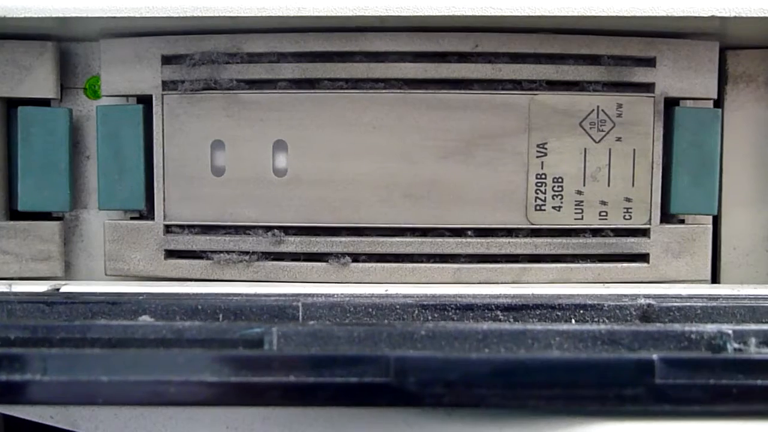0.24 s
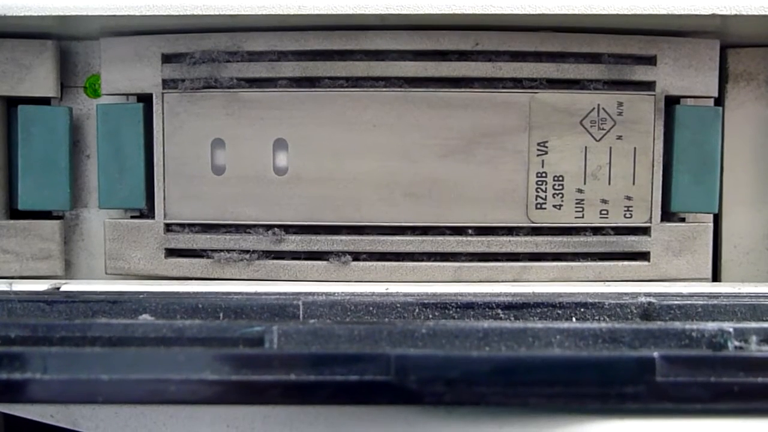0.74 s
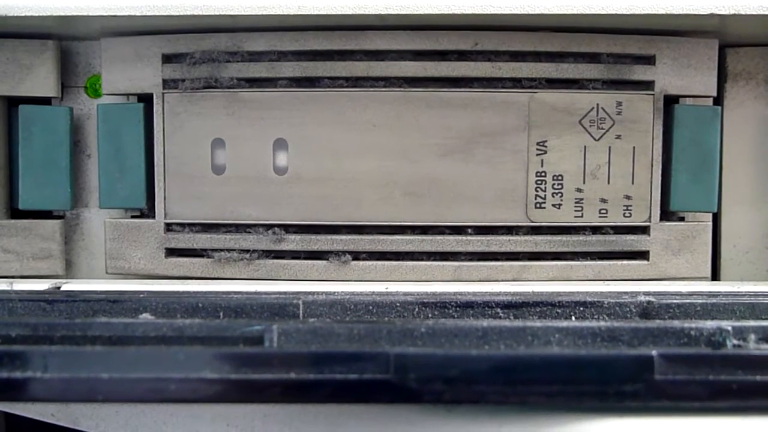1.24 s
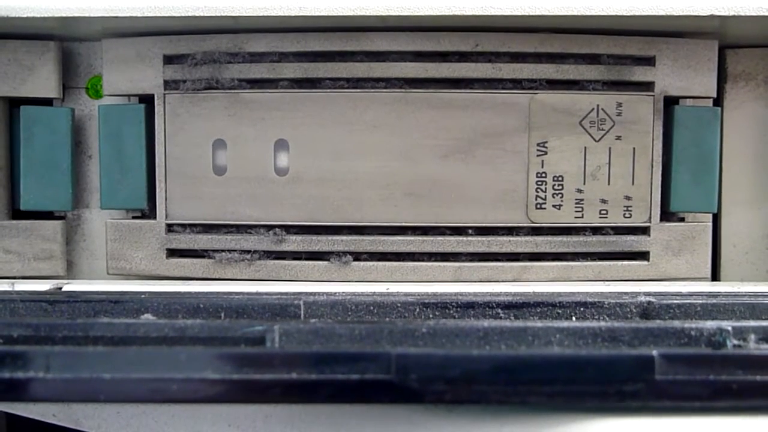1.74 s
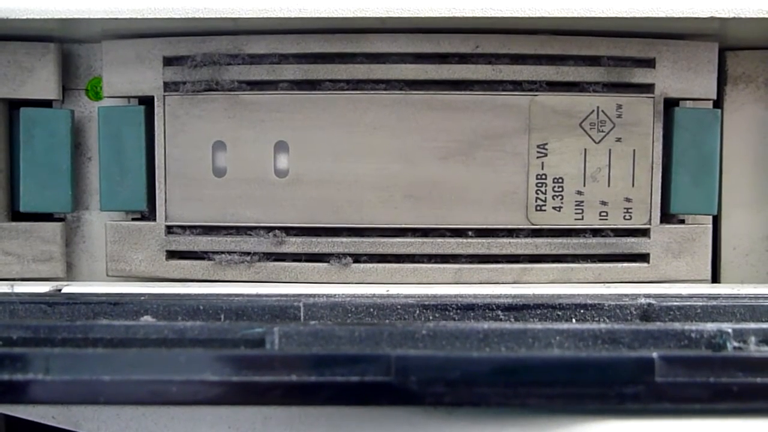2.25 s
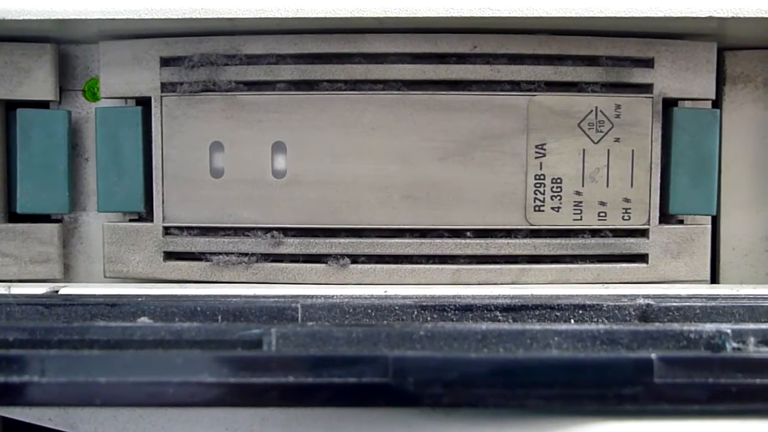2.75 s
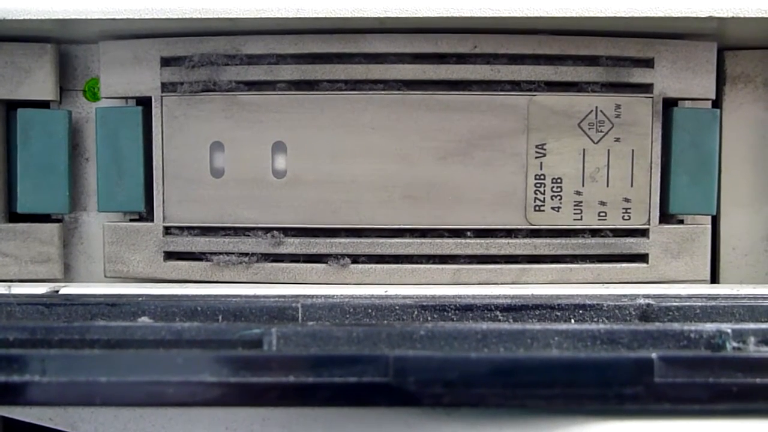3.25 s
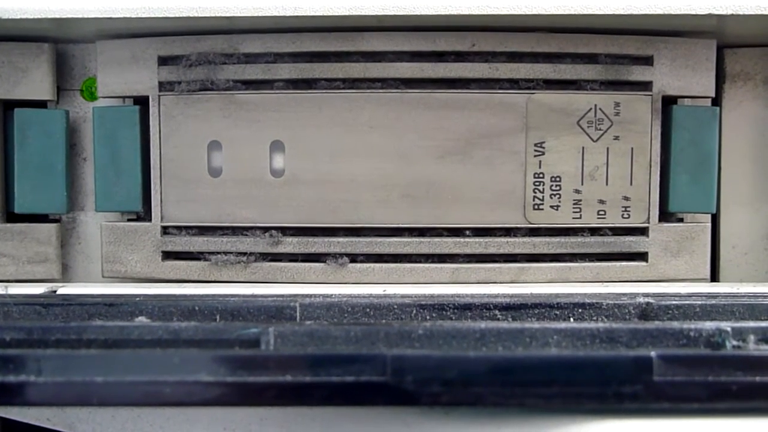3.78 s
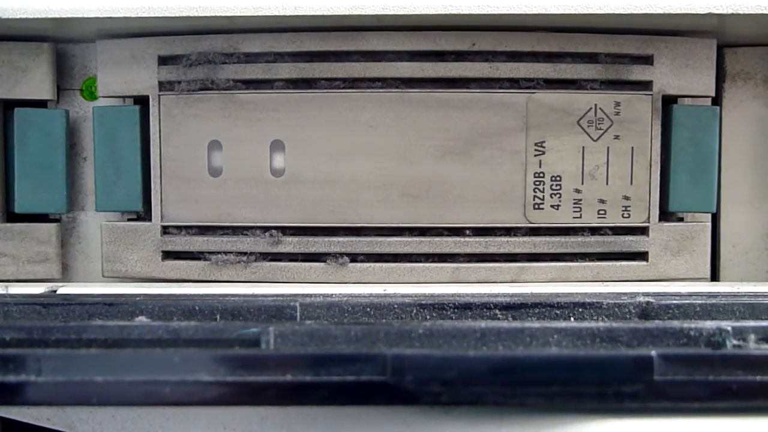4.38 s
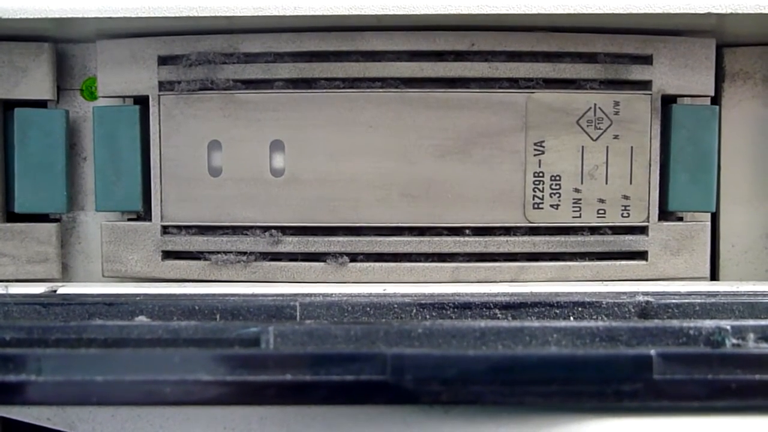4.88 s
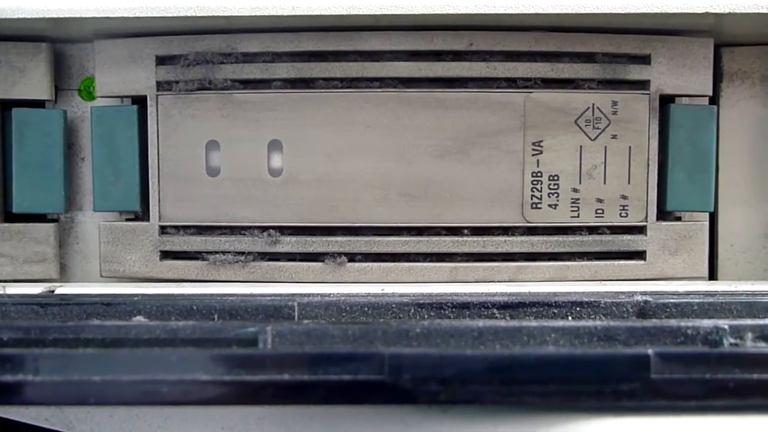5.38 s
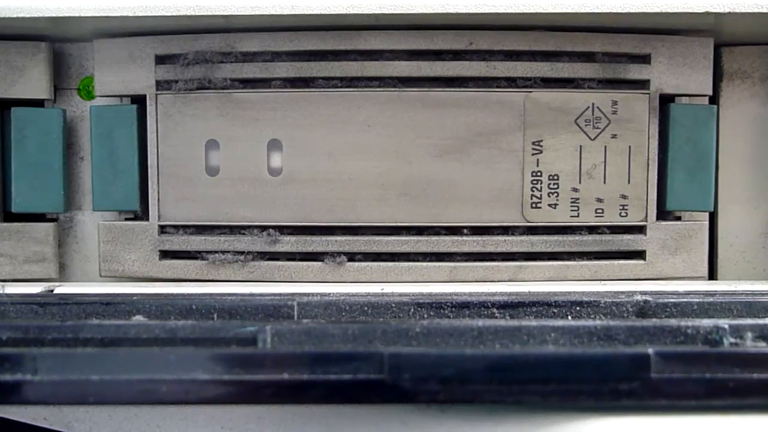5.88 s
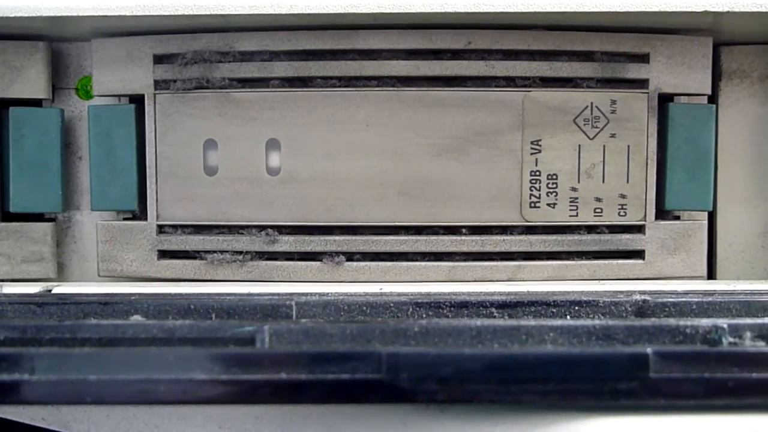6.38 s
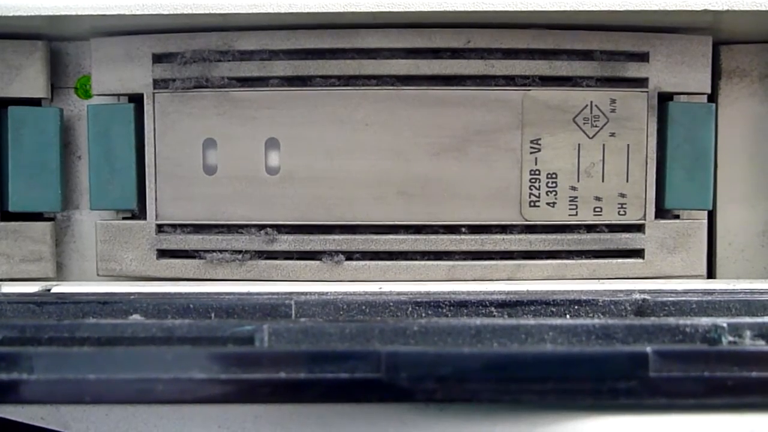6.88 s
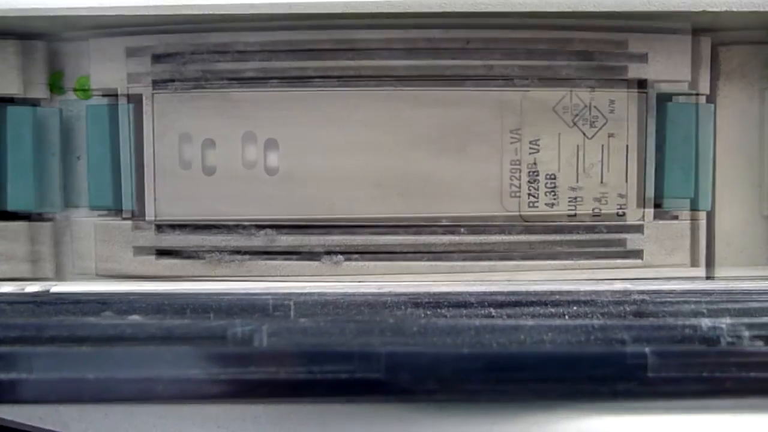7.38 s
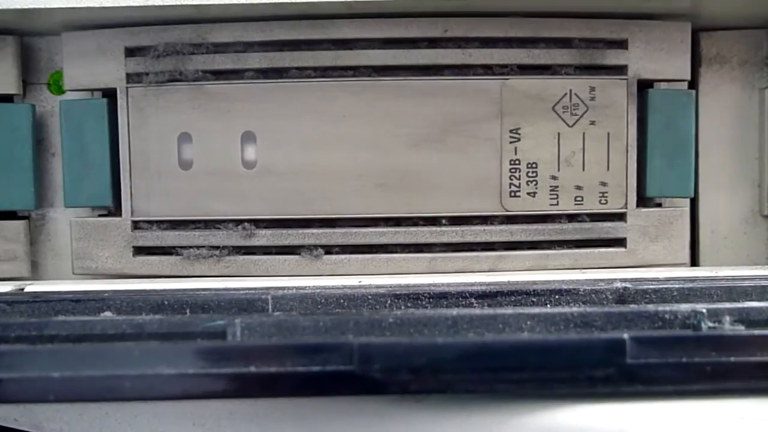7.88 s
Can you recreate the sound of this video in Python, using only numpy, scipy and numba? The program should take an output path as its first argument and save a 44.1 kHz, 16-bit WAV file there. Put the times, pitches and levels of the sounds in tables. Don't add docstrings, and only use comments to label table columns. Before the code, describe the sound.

An old hard drive's worn bearing whines upward in pitch, a latch clicks sharply midway, then the harsh whine holds steady over a faint hum.

```python
import sys
import numpy as np
from scipy import signal
from scipy.fft import rfft, irfft, next_fast_len
from scipy.io import wavfile
from scipy.ndimage import uniform_filter1d
from numba import njit

SR = 44100
rng = np.random.default_rng(int(sys.argv[2]) if len(sys.argv) > 2 else 0)


def store_wav(level_fs):
    pcm = np.round(np.clip(np.atleast_2d(level_fs), -1, 1) * 32767)
    wavfile.write(sys.argv[1], SR, pcm.T.astype(np.int16))


def how_loud(loudness_db):
    steps = np.asarray(loudness_db, float) / 20
    return 10 ** steps


N = 358533
T = np.arange(N) / SR
CAGE = 0.62875
TURN = 4096

# time in seconds, spindle turns per second.
SPINDLE_SPEED = [(0.0, 88.04), (0.4, 92.31), (0.8, 96.35), (1.2, 100.24), (1.6, 103.75), (2.0, 106.97),
                 (2.4, 109.81), (2.8, 112.19), (3.2, 114.32), (3.6, 116.17), (4.0, 117.84), (4.4, 119.24),
                 (4.8, 120.25), (5.0, 120.54), (5.2, 120.41), (5.4, 119.97), (5.8, 120.01), (8.13, 120.01)]


def spindle_turns():
    return np.cumsum(np.interp(T, *np.transpose(SPINDLE_SPEED))) / SR


# multiple of the dent rate, level in dB.
WEAR_BELOW = [(1, -53), (2, -58), (3, -45), (4, -42), (16, -42), (18, -46), (36, -46)]
WEAR_ON = [(1, -48), (2, -58), (3, -37), (9, -53), (12, -40.5), (16, -38.5), (25, -52), (27, -76)]
WEAR_ABOVE = [(1, -73), (2, -47), (3, -48), (4, -44), (11, -42), (16, -44), (18, -48), (36, -44.5)]
# one value per ball, in dB per octave above the fourth multiple.
EDGE_DB_PER_OCTAVE = (1.2, 0, -.8)
# level in dB below, on and above.
FINE_ROUGHNESS_DB = (-55, -62, -53)
# multiple of the dent rate, ball from 1 to 3, cage rates off, level in dB.
MARKS = [(14, 1, 1, -44), (3, 3, -1, -40), (4, 1, -1, -38), (5, 2, -1, -36), (6, 1, -1, -38),
         (6, 2, -1, -37), (6, 3, -1, -45), (14, 1, -1, -42), (4, 3, -1, -46), (8, 2, -1, -37),
         (10, 1, 1, -47), (11, 3, -1, -35), (12, 1, -1, -34), (13, 1, -1, -36), (16, 1, -1, -35),
         (3, 2, 0, -35), (3, 3, 0, -30), (4, 1, 0, -34), (28, 1, 1, -44), (10, 2, 0, -42), (6, 1, 0, -41),
         (6, 2, 0, -43), (19, 1, 0, -48), (19, 2, 0, -39), (3, 3, 1, -43), (6, 1, 1, -36), (6, 2, 1, -33),
         (6, 3, 1, -45), (11, 3, 1, -35), (13, 2, 1, -34)]
# half multiple of
# the dent rate, level in dB below, on and above.
HALF_MULTIPLES = [(1.5, -70, -53, -49), (2.5, -70, -40, -52), (3.5, -58, -44, -55), (4.5, -42, -50, -46),
                  (5.5, -45, -54, -48), (6.5, -48, -56, -51), (7.5, -49, -70, -51), (8.5, -48, -70, -49),
                  (9.5, -49, -70, -49), (10.5, -49, -48, -60), (11.5, -47, -47, -51), (12.5, -49, -48, -49),
                  (13.5, -49, -52, -50), (14.5, -48, -53, -50)]


def ball_surface(ball, side, wear_spread_db=1.5):
    db = np.full(TURN, -200.0)
    scatter = rng.standard_normal(TURN)
    multiple = np.arange(1, 37)
    on_multiple, between = 2 * multiple, 2 * multiple + 1

    edges_db = EDGE_DB_PER_OCTAVE[ball] * np.log2(np.maximum(multiple / 4, 1))
    wear_db = slope((WEAR_BELOW, WEAR_ON, WEAR_ABOVE)[side])(multiple) + edges_db
    db[on_multiple] = wear_db + wear_spread_db * scatter[on_multiple]
    db[between] = FINE_ROUGHNESS_DB[side] + 2.5 * scatter[between]

    for mark_multiple, worn_ball, cage_off, mark_db in MARKS:
        if (worn_ball - 1, cage_off + 1) == (ball, side):
            db[2 * mark_multiple] = mark_db
    for half_multiple, *half_db in HALF_MULTIPLES:
        step = int(2 * half_multiple)
        db[step] = half_db[side] - 5 + 2.5 * scatter[step]

    phases = np.exp(2j * np.pi * rng.random(TURN))
    return np.fft.ifft(np.sqrt(2) * how_loud(db) * phases) * TURN


DENT_PASSES = (3.5375, 3.5407, 3.5438)
# centre in Hz, width in Hz, boost or cut in dB.
BACKWARD_WHIRL = [(1225, 84, -15), (1377, 45, -10), (1471, 35, -10), (1728, 35, -13), (1836, 44, 8),
                  (1982, 48, -8), (2171, 96, -11), (2300, 35, 10), (2404, 35, 12), (2481, 210, -12),
                  (2588, 103, 6), (3311, 35, -9), (4435, 400, -14), (4598, 282, 15), (4868, 216, -9),
                  (5883, 242, 3), (7137, 58, -15), (11257, 95, 4), (2474, 30, 6)]
AXIAL = [(909, 153, -15), (1048, 35, 9), (1883, 81, -5), (2036, 51, -15), (2095, 244, 13), (2312, 35, 7),
         (2510, 118, -11), (2721, 42, -15), (3069, 149, -15), (3916, 250, -12), (4473, 49, 12),
         (4823, 336, -15), (5527, 35, 6), (5952, 287, -15), (6693, 109, 7), (7025, 55, 7), (7446, 168, 9),
         (8173, 327, 7), (372, 40, 9), (425, 40, -5)]
FORWARD_WHIRL = [(1328, 35, 13), (1532, 35, -15), (1619, 40, -15), (1659, 100, 11), (2001, 91, 15),
                 (2096, 400, -14), (2472, 62, 9), (2598, 41, 15), (2609, 35, -14), (2937, 193, 5),
                 (3322, 103, 7), (3676, 50, 5), (4584, 373, -12), (4770, 65, 15), (4956, 174, 10),
                 (5577, 148, -6), (5950, 400, 7), (11983, 136, 7)]
# frequency in Hz, lift in dB.
TREBLE_LIFT = [(200, 0), (6000, 0), (8000, 2), (12000, 2.5), (16000, 2)]


def balls(turns, load_db=1.8):
    places = []
    for passes in DENT_PASSES:
        skid = 0.0055 * walk(2.5)
        places.append((passes * turns / 2 + skid) % 1 * TURN)

    out = 0
    for side, modes in enumerate((BACKWARD_WHIRL, AXIAL, FORWARD_WHIRL)):
        force = 0
        for ball, place in enumerate(places):
            table = ball_surface(ball, side)
            whole = place.astype(int)
            rise_to_next = np.roll(table, -1) - table
            contact = table[whole] + (place - whole) * rise_to_next[whole]
            force = force + how_loud(load_db * walk(3.045)) * contact
        cage_shift = np.exp(2j * np.pi * (side - 1) * CAGE * turns)
        force = (force * cage_shift).real
        out = out + colour(force, lambda f: bells(f, modes) + slope(TREBLE_LIFT)(f))
    return out


# frequency in Hz, level in dB.
HISS_COLOUR = [(150, -26), (250, -1.5), (500, -1), (1000, -3.5), (1800, -4), (2500, -4), (3500, -3),
               (5000, -3), (7000, -5.5), (10000, -3.5), (13000, -5.5), (16000, 4.5)]


def hiss(turns, hiss_db=-12, beat=0.11, flicker_db=0.5):
    swell = 1 + beat * np.cos(4 * np.pi * CAGE * turns)
    noise = how_loud(hiss_db + flicker_db * walk(12)) * swell * rng.standard_normal(N)
    return colour(noise, slope(HISS_COLOUR))


# frequency in Hz, level in dB.
CASE_TILT = [(150, -27.4), (250, -12.2), (400, -14.8), (800, -12.8), (1400, -8.7), (2400, 0.0),
             (3200, -10.2), (5000, -18.8), (8000, -14.7), (12000, -23.7), (15600, -19.4)]
# centre in Hz, width in Hz, boost or cut in dB.
CASE_MODES = [(275, 70, 7), (630, 140, 7.4), (1049, 57, 8), (1143, 85, 3.7), (1593, 164, 7.1),
              (1806, 69, 6.1), (2489, 455, 13.3), (2672, 284, -7.6), (2887, 77, -14.4), (2997, 88, 4.2),
              (3697, 201, 5.1), (4471, 35, 5.6), (4608, 68, 11.5), (4854, 363, 13.4), (5380, 184, 5.6),
              (5937, 277, 7.7), (6230, 119, 6.6), (7835, 140, -13.7), (8234, 405, 22.4), (8301, 384, -22.8),
              (9566, 650, 23.4), (9683, 684, -25.0), (10955, 126, 4.3), (11302, 290, 13.5),
              (12109, 490, 15.1), (12887, 263, -6.0), (14356, 731, -21), (14568, 402, 17.3),
              (14948, 537, -8.7), (15826, 672, -25.0)]


def case(forces):
    return colour(forces, lambda f: slope(CASE_TILT)(f) + bells(f, CASE_MODES))


# start in seconds, level in dB.
CLICKS = [
    (4.5943, -7.5),
    (4.5953, -11),
    (4.5964, -6.5),
    (4.598, -14),
    (7.6236, -28),
]
# pitch in Hz, level in dB, seconds to fade by 60 dB.
LATCH_RING = [(3650, 0, .025), (5200, -3, .015), (6300, -5, .01), (8037, -7, .01), (9300, -6, .01),
              (11020, -4, .02)]


def latch(push_s=0.0012):
    blow, rattle = np.zeros(N), np.zeros(N)
    for start, db in CLICKS:
        blow[int(start * SR)] = how_loud(db)
        rattle += how_loud(db) * (T >= start) * np.exp(-np.maximum(T - start, 0) / push_s)

    age = T[:SR // 10]
    ring = 0
    for hz, db, fade_s in LATCH_RING:
        tone = np.sin(2 * np.pi * (hz * age + rng.random()))
        ring = ring + how_loud(db) * tone * 1000.0 ** (-age / fade_s)

    ringing = how_loud(-5) * signal.fftconvolve(blow, ring)[:N]
    snap = ringing + how_loud(-2) * rattle * rng.standard_normal(N)
    band = signal.butter(4, (3200, 11500), "bandpass", fs=SR, output="sos")
    return signal.sosfilt(band, snap)


# pitch in Hz, level in dB.
FAN_TONES = [(325.77, -40.5), (321.9, -50), (1061.27, -43), (1056.39, -44), (952.9, -53)]
# frequency in Hz, level in dB.
AIR_COLOUR = [(15, -50), (40, -35), (64, -13), (80, -20.5), (130, -6.5), (176, -4.5), (200, 6.5)]


def fan(air_db=-34):
    tones = 0
    for hz, db in FAN_TONES:
        sway_db, lag = 0.7 * walk(2), 0.3 * walk(1)
        tones = tones + how_loud(db + sway_db) * np.sqrt(2) * np.sin(2 * np.pi * hz * T + lag)
    top_hz = AIR_COLOUR[-1][0]
    air = colour(rng.standard_normal(N), lambda f: slope(AIR_COLOUR)(f) - 80 * (f > top_hz))
    return tones + how_loud(air_db) * air


def walk(rate):
    hold = int(SR / rate)
    steps = np.repeat(rng.standard_normal(N // hold + 1), hold)
    return 1.43 * uniform_filter1d(uniform_filter1d(steps, hold), hold)[:N]


def colour(x, db_at):
    size = next_fast_len(N)
    hz = np.maximum(np.arange(size // 2 + 1) * SR / size, 1)
    return irfft(rfft(x, size) * how_loud(db_at(hz)), size)[:N]


def slope(points):
    hz, db = np.transpose(points)
    return lambda f: np.interp(np.log(f), np.log(hz), db, left=-90)


def bells(f, modes):
    return sum(db / (1 + (2 * (f - hz) / width) ** 2) for hz, width, db in modes)


def scene():
    turns = spindle_turns()
    forces = how_loud(0.8) * balls(turns) + hiss(turns)
    return (case(forces) + latch() + fan())[None]


@njit
def follow(x, start, rise, fall):
    out, level = np.empty(len(x)), start
    for i in range(len(x)):
        level += (x[i] - level) * (rise if x[i] > level else fall)
        out[i] = level
    return out


def roll_off(x):
    return signal.sosfilt(signal.butter(12, 15650, fs=SR, output="sos"), x)


def record(dry):
    steady_peak = how_loud(-10)
    ratio, attack_s, release_s = 6.2, 0.0005, 0.4
    peak = follow(np.abs(dry[0]), float(steady_peak), 1 / (attack_s * SR), 1 / (release_s * SR))
    gain = (steady_peak / peak) ** (1 - 1 / ratio)
    return roll_off(dry * gain)


dry = scene()
out = record(dry)
store_wav(out)
```